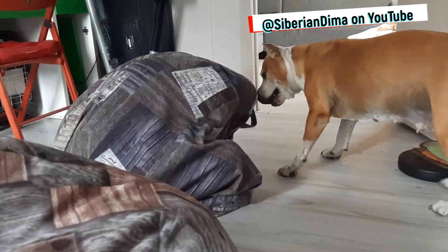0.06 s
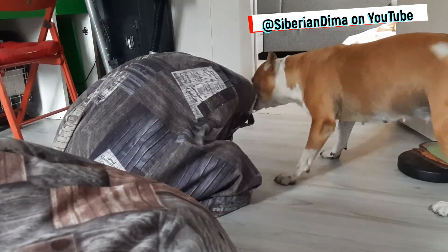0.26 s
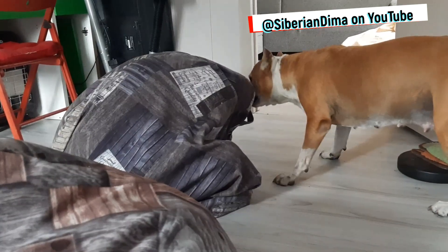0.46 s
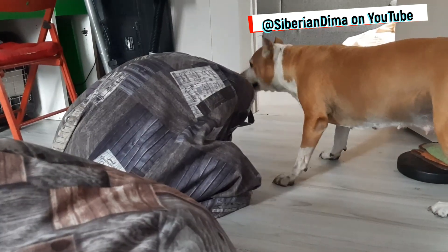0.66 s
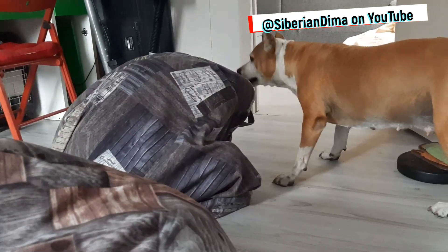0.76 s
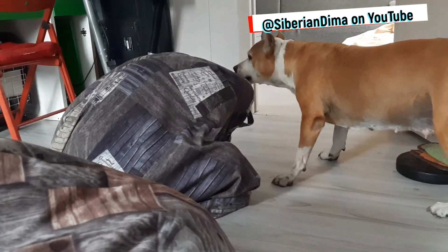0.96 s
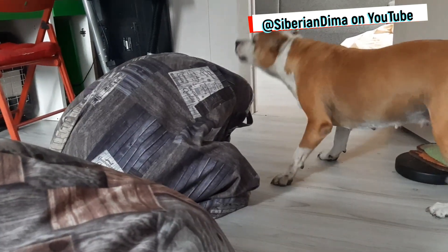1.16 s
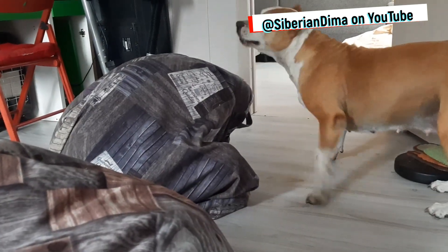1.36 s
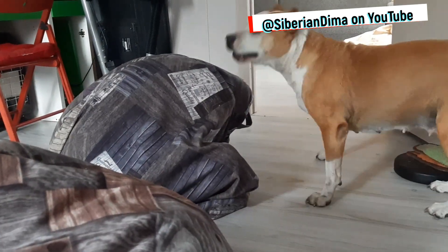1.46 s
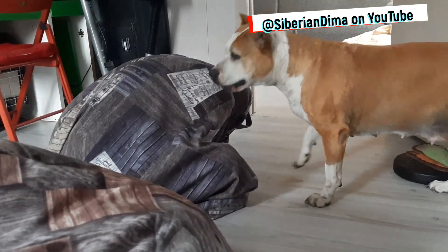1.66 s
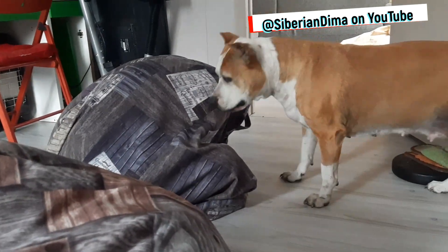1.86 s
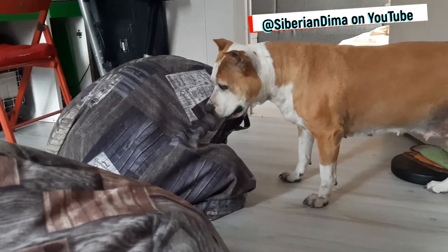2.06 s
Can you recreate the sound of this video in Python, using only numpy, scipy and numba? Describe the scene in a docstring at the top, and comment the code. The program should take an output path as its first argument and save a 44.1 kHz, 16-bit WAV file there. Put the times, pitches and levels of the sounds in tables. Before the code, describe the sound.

A dog sniffs faintly, then gives a short gruff bark at about 0.25 seconds that opens into a huff, while its claws click and paws thud on a hard floor. A second bark follows at about 1.15 seconds with a hiss of breath. More steps click, thud and scrape until about 1.9 seconds, ending with a faint paw squeak. The sound is close, in a small, slightly ringing room.

```python
"""A dog sniffs in a small, bare room; claws click and paws scuff on the hard floor.
At 0.25 s it barks, short and gruff: rough vocal pulses ring throat and chest, then open into a huff.
Its pads thud on the boards. At 1.15 s a second bark follows, with a hiss through nose and teeth.
More steps click, thud and scrape, and one pad squeaks faintly near the end.
Throughout, the walls ring briefly over faint steady air; the close microphone dulls the top octave."""
import sys
import numpy as np
from scipy import signal
from scipy.fft import rfft, irfft, next_fast_len
from scipy.io import wavfile
from numba import njit

SR = 44100
rng = np.random.default_rng(int(sys.argv[2]) if len(sys.argv) > 2 else 0)


def store_wav(level_fs):
    """Save 16-bit WAV to argv[1]."""
    pcm = np.round(np.clip(np.atleast_2d(level_fs), -1, 1) * 32767)
    wavfile.write(sys.argv[1], SR, pcm.T.astype(np.int16))


N = 92610

# pad landings: start_s, thud_db, thud_hz, decay_s, pat_db
PAD_LANDINGS = [(.001, -52, 79, 0.027, -58.5), (0.293, -25.5, 95, 0.0068, -23.5),
                (0.324, -36.5, 73, 0.035, -33), (.41, -34, 137, .014, -39), (.452, -39, 81, .022, -48.5),
                (0.576, -50.5, 76.5, 0.025, -67), (1.23, -31.5, 84, 0.012, -32.5),
                (1.279, -34.5, 105.7, 0.018, -49), (1.313, -42.5, 75.3, 0.027, -44),
                (1.426, -31, 143, 0.0093, -38.5), (1.473, -41, 116.7, 0.011, -66),
                (1.513, -48.5, 76.3, 0.018, -63), (1.683, -63, 77, 0.022, -54),
                (1.805, -38, 145, 0.006, -62), (1.811, -40.5, 78, 0.015, -50.5),
                (1.879, -40.5, 75.7, 0.015, -54)]


def amp(db):
    """Decibels to gain."""
    return 10 ** (np.asarray(db) / 20)


def unit(x):
    """Scale to rms 1."""
    return x / np.sqrt(np.mean(x ** 2))


def band(x, hz, width_hz):
    """One resonance, gain 1 at its centre."""
    return signal.lfilter(*signal.iirpeak(hz, hz / width_hz, fs=SR), x)


def steep(x, hz, width_hz):
    """Two wider resonances in series: steep skirts."""
    return band(band(x, hz, 1.5 * width_hz), hz, 1.5 * width_hz)


@njit
def moving_band(x, hz, width_hz):
    """State-variable resonance with a moving centre."""
    y, band_state, low_state = np.empty(len(x)), 0., 0.
    for i in range(len(x)):
        g, damping = np.tan(np.pi * hz[i] / SR), width_hz / hz[i]
        v = (band_state + g * (x[i] - low_state)) / (1 + g * (g + damping))
        band_state = 2 * v - band_state
        low_state += 2 * g * v
        y[i] = damping * v
    return y


def gliding(x, hz, stage_width_hz):
    """Two moving resonances in series."""
    return moving_band(moving_band(x + 1e-18, hz, stage_width_hz) + 1e-18, hz, stage_width_hz)


def colour(x, points):
    """Minimum-phase filter through (freq_hz, gain_db) points."""
    hz, db = np.array(points, float).T
    n = 2 * next_fast_len(N)
    curve_db = np.interp(np.log(np.fft.rfftfreq(n, 1 / SR) + 1), np.log(hz), db)
    cepstrum = irfft(np.log(amp(curve_db)))
    cepstrum[1:n // 2] *= 2
    cepstrum[n // 2 + 1:] = 0
    return irfft(rfft(x, n) * np.exp(rfft(cepstrum)))[..., :N]


def swell(start_s, length_s):
    """Rounded arch envelope."""
    u = np.clip((np.arange(N) / SR - start_s) / length_s, 0, 1)
    return np.sqrt(4 * u * (1 - u))


def pan(x, left_db):
    """Place a source by level difference, left minus right."""
    return x * amp(np.array([[left_db], [-left_db]]) / 2)


def bark(contour, throat, chest_hz, chest_db, opens_s, opening_s, rise):
    """Vocal pulses and air ring throat and chest; upper resonances enter and rise as the mouth opens."""
    # dips cut by the nose: centre_hz, width_hz
    nasal_dips = [(640, 100), (1130, 220)]
    jitter, shimmer_db = 0.1, 10.5  # at roughness 1
    low_stage_width_hz, widening_s = 192, 0.067
    t = np.arange(N) / SR
    times_s, *columns = np.array(contour, float).T
    pitch_hz, voice_db, huff_db, low_hz, roughness = (np.interp(t, times_s, c) for c in columns)
    pulses, now_s = np.zeros(N), times_s[0]
    for stretch, size in rng.standard_normal((100, 2)):
        i = int(now_s * SR)
        if now_s < times_s[-1]:
            pulses[i] = amp(shimmer_db * roughness[i] * size) * np.sqrt(SR / pitch_hz[i])
            now_s += np.exp(jitter * roughness[i] * stretch) / pitch_hz[i]
    sounding = (t > times_s[0]) & (t < times_s[-1])
    rasp = roughness * rng.standard_normal(N) * sounding
    folds = (pulses + rasp) * amp(voice_db) * np.sqrt(SR / low_stage_width_hz / 4)
    huff = 5 * rng.standard_normal(N) * amp(huff_db) * sounding
    mouth = np.clip((t - opens_s) / opening_s, .1, 1)
    glide = 1 + rise * np.clip((t - opens_s - opening_s) / widening_s, 0, 1)
    voice = gliding(folds, low_hz, low_stage_width_hz)
    for hz, width_hz, voice_gain_db, huff_gain_db in throat:
        drive = folds * mouth * amp(voice_gain_db) + huff * amp(huff_gain_db)
        voice += gliding(drive, hz * glide, 1.46 * width_hz)
    voice += amp(chest_db) * steep(folds, chest_hz, width_hz=120)
    for hz, width_hz in nasal_dips:
        voice -= band(voice, hz, width_hz)
    chest_heave = unit(steep(rng.standard_normal(N), hz=110, width_hz=35))
    return voice + chest_heave * sounding * amp(voice_db - 11.5) / 2


def hiss():
    """The second bark blows air through nose and teeth."""
    # envelope: time_s, level_db
    hiss_levels = [(1.114, -64.5), (1.152, -52.5), (1.171, -34.5), (1.21, -28.5), (1.245, -28.5),
                   (1.285, -34), (1.31, -39)]
    # spectrum: freq_hz, gain_db
    hiss_spectrum = [(1000, -39.5), (2700, -8.5), (3500, -9), (5200, 2.5), (7000, -4.5), (9000, -10),
                     (16000, -12)]
    times_s, level_db = np.array(hiss_levels).T
    envelope = amp(np.interp(np.arange(N) / SR, times_s, level_db, left=-np.inf, right=-np.inf))
    return unit(colour(rng.standard_normal(N), hiss_spectrum)) * envelope


def sniff(level_db=-50.5):
    """A short draw of air through the nose."""
    # spectrum: freq_hz, gain_db
    sniff_spectrum = [(200, -12), (1000, -11), (3000, -11.5), (5500, 3), (8000, -2), (12000, -4.5),
                      (16000, -10.5)]
    breath = unit(colour(rng.standard_normal(N), sniff_spectrum))
    return breath * swell(start_s=0.068, length_s=0.11) * amp(level_db)


def claws():
    """Each claw strike rings briefly, with a weaker overtone, over a broad tick."""
    # claw strikes: start_s, ring_gain_db, ring_hz, tick_gain_db
    strikes = [(0.1951, 0, 6940, -19), (0.1965, 0, 5420, -25.5), (0.2848, 9.5, 5220, -22),
               (0.2865, 10.5, 5110, -20.5), (0.2884, -5, 5050, -18.5), (1.2928, -3.5, 4450, -13.5),
               (1.2986, 3.5, 5370, -21), (1.4177, 4, 5500, -20.5), (1.4211, -0.5, 4990, -20),
               (1.6798, -3, 6360, -25.5), (1.6854, -3, 5470, -29), (1.7962, 6, 5420, -19.5),
               (1.8013, 0, 5000, -22), (1.8091, 8.5, 5190, -15)]
    # spectrum: freq_hz, gain_db
    tick_spectrum = [(200, -18.5), (900, -4.5), (2000, -2.5), (3800, 6.5), (7000, 6.5), (16000, -10)]
    stage_width_hz, tick_decay_s, boost_db, overtone_db = 1210, 0.0025, 14, -14
    t, rings, ticks = np.arange(N) / SR, np.zeros(N), np.zeros(N)
    for start_s, ring_gain_db, ring_hz, tick_gain_db in strikes:
        blow = np.full(N, 1e-18)
        blow[int(start_s * SR)] = amp(ring_gain_db + boost_db)
        rings += steep(steep(blow, ring_hz, stage_width_hz), ring_hz, stage_width_hz)
        rings += amp(overtone_db) * steep(blow, hz=7760, width_hz=380)
        ticks += amp(tick_gain_db) * (t >= start_s) * np.exp(-np.abs(t - start_s) / tick_decay_s)
    return rings + colour(ticks * rng.standard_normal(N), tick_spectrum)


def thuds():
    """Each paw rings the floorboards at the pitch of the spot where it lands."""
    t, boards = np.arange(N) / SR, np.zeros(N)
    for start_s, thud_db, thud_hz, decay_s, _ in PAD_LANDINGS:
        age_s = np.maximum(t - start_s, 0)
        envelope = amp(thud_db) * age_s / decay_s * np.exp(1 - age_s / decay_s)
        boards += envelope * np.sin(2 * np.pi * thud_hz * age_s)
    return boards


def pats(decay_s=0.016):
    """Each pad lands with a dull slap that swells and dies quickly."""
    # spectrum: freq_hz, gain_db
    pat_spectrum = [(40, -28.5), (90, -8.5), (140, -1), (420, -14), (800, -19), (1600, -29.5),
                    (5000, -36)]
    t, envelope = np.arange(N) / SR, np.zeros(N)
    for start_s, _, _, _, pat_db in PAD_LANDINGS:
        age = np.maximum(t - start_s, 0) / decay_s
        envelope += amp(pat_db) * 2 * np.sqrt(age) * np.exp(-age)
    return envelope * unit(colour(rng.standard_normal(N), pat_spectrum))


def scuffs(grain_db=4, grain_samples=32, squeak_db=-49.5):
    """Grainy friction of sliding paws; one rubbing pad squeaks faintly."""
    # paw slides: start_s, length_s, level_db
    slides = [(0.197, 0.033, -34), (0.202, 0.09, -35.5), (1.527, 0.12, -46), (1.61, 0.035, -44),
              (1.666, 0.025, -28), (1.68, 0.068, -41), (1.793, 0.058, -33)]
    # spectrum: freq_hz, gain_db
    slide_spectrum = [(200, -14), (900, -10.5), (2100, -5), (2800, -7.5), (4000, 6), (7000, 5),
                      (16000, -15)]
    # rubbing pad resonances: centre_hz, width_hz, gain_db
    squeak_modes = [(262, 54, 5.5), (573, 176, -1), (1007, 74, 5), (2155, 450, -10.5)]
    noise = rng.standard_normal(N)
    grip = np.repeat(rng.standard_normal(N // grain_samples + 1), grain_samples)[:N]
    grains = noise * amp(grain_db * grip)
    strokes = sum(amp(db) * swell(start_s, length_s) for start_s, length_s, db in slides)
    slide = unit(colour(grains, slide_spectrum)) * strokes
    squeak = unit(sum(amp(db) * steep(grains, hz, width_hz) for hz, width_hz, db in squeak_modes))
    return slide + squeak * swell(start_s=1.836, length_s=0.13) * amp(squeak_db)


def room(x):
    """Direct sound from the right, near echoes, then a tail that differs per ear above the bass."""
    # reverberation bands: centre_hz, t60_s, level_db
    tail_bands = [(68.8, 0.81, -5), (200, 0.31, -2), (434, 0.27, -5.5), (880, 0.26, 2.5), (1940, 0.32, 8),
                  (3498, 0.31, 3), (4950, 0.29, -11.5), (12000, 0.26, 1.5)]
    # nearby surfaces: delay_s, gain_db, left_share
    echoes = [(.0007, -18, .95), (.0011, -12.5, 1), (.0017, -18, 0.5), (.0024, -7.5, 0.6),
              (.0047, -6.5, 0.9)]
    build_s, diffuse_hz, tail_left_db = 0.0025, 208, -0.5
    direct_left_db, direct_right_db, left_lag_s = -3, 2, .00026
    t = np.arange(SR) / SR
    centre_hz, t60_s, level_db = np.array(tail_bands, float).T
    freq_hz = np.fft.rfftfreq(SR, 1 / SR) + 1
    noise = rfft(rng.standard_normal((2, SR)))
    apart = freq_hz ** 2 / np.hypot(freq_hz ** 2, diffuse_hz ** 2)
    noise[0] = apart * noise[0] + np.sqrt(1 - apart ** 2) * noise[1]
    response = np.zeros((2, SR))
    for k, pick in enumerate(np.eye(len(centre_hz))):
        band_noise = irfft(noise * np.interp(np.log(freq_hz), np.log(centre_hz), pick))
        fade = amp(-60 * t / t60_s[k]) * np.minimum(t / build_s, 1)
        response += band_noise * amp(level_db[k]) * fade / np.linalg.norm(fade)
    response[0] *= amp(tail_left_db)
    near = np.zeros((2, SR))
    for delay_s, gain_db, left_share in echoes:
        near[:, int(delay_s * SR)] += amp(gain_db) * np.array([left_share, 1 - left_share])
    response += signal.sosfilt(signal.butter(1, 1000, "high", fs=SR, output="sos"), near)
    response[0, int(left_lag_s * SR)] += amp(direct_left_db)
    response[1, 0] += amp(direct_right_db)
    return signal.fftconvolve(x, response, axes=1)[:, :N]


def room_air(level_db=-62.5):
    """Faint steady air, mostly different in each ear."""
    # spectrum: freq_hz, gain_db
    air_spectrum = [(25, -1.5), (50, -19), (75, -3), (95, -8.5), (120, 0.5), (160, -17.5), (300, -18),
                    (400, -32.5), (500, -11), (650, -21.5), (1050, -32), (1460, -12), (1700, -22.5),
                    (2020, -11), (2600, -23), (3400, -19), (5500, -19.5), (16000, -26.5)]
    noise = rng.standard_normal(N) + 2.1 * rng.standard_normal((2, N))
    return unit(colour(noise, air_spectrum)) * amp(level_db)


def scene():
    """Two barks and footwork in the room, over its air."""
    # bark contours: time_s, pitch_hz, voice_db, huff_db, lowest_resonance_hz, roughness
    first_contour = [(.244, 219.9, -27, -72, 330, 0.31), (.256, 226, -15.5, -53, 435, 0.31),
                     (.263, 206.3, -17, -50.5, 420, 0.37), (.271, 202.1, -21, -44, 405, 0.42),
                     (.286, 221.6, -19, -43, 450, 0.3), (.312, 229, -25.5, -40, 280, 0.5),
                     (.335, 186.7, -37, -31, 300, 0.3), (.375, 176.6, -51, -43.5, 320, 0),
                     (.43, 171, -63.5, -74.5, 300, 0.6)]
    second_contour = [(1.146, 225.7, -33, -54.5, 218.3, 0.47), (1.158, 249.3, -26, -49.5, 276, 0.27),
                      (1.183, 310.2, -22.5, -41, 340, 0.51), (1.194, 305.2, -23.5, -37, 356, 0.63),
                      (1.204, 110.8, -23, -29.5, 294, 0.62), (1.243, 108.3, -35.5, -28.5, 337, 0.44),
                      (1.262, 100.6, -35, -44, 357, 0.64), (1.30, 93.9, -52.5, -47, 312, 0.46)]
    # upper throat and mouth resonances: centre_hz, width_hz, voice_gain_db, huff_gain_db
    first_throat = [(777, 50, 1, 0.5), (1560, 540, -29, -6), (2420, 1000, -48.5, -16),
                    (4540, 8400, -37.5, -12)]
    second_throat = [(438, 156, -5, 4), (710, 115, 3.5, -5), (1430, 82, -13, 7), (2324, 99, -31, -0.5)]
    first = bark(first_contour, first_throat, chest_hz=215, chest_db=-6.5,
                 opens_s=.255, opening_s=0.014, rise=0.061)
    second = bark(second_contour, second_throat, chest_hz=112, chest_db=-1,
                  opens_s=1.15, opening_s=0.029, rise=0.064)
    air = room_air()
    voice = pan(first + sniff(), left_db=-3.0) + pan(second + hiss(), left_db=0.1)
    paws = pan(claws(), left_db=-2.4) + pan(scuffs() + pats(), left_db=0.4)
    return room(voice + paws) + pan(thuds(), left_db=-3.0) + pan(air, left_db=-5.0)


def record(dry):
    """The microphone dulls the top octave, rounds the loudest peaks and cuts off the top."""
    # microphone response: freq_hz, gain_db
    mic_response = [(20, -13), (55, 2), (6900, -1.5), (7600, -10), (8300, -25.5), (9300, -19), (11000, -12),
                    (16000, -7.5)]
    ceiling, cutoff_hz = .9, 15800
    dulled = colour(dry, mic_response)
    rounded = dulled / (1 + (dulled / ceiling) ** 6) ** (1 / 6)
    return signal.sosfilt(signal.ellip(8, .2, 70, cutoff_hz, fs=SR, output="sos"), rounded)


dry = scene()
out = record(dry)
store_wav(out)
```